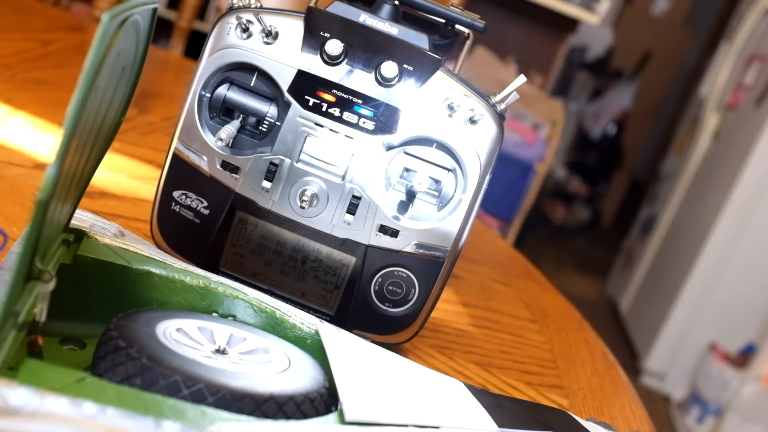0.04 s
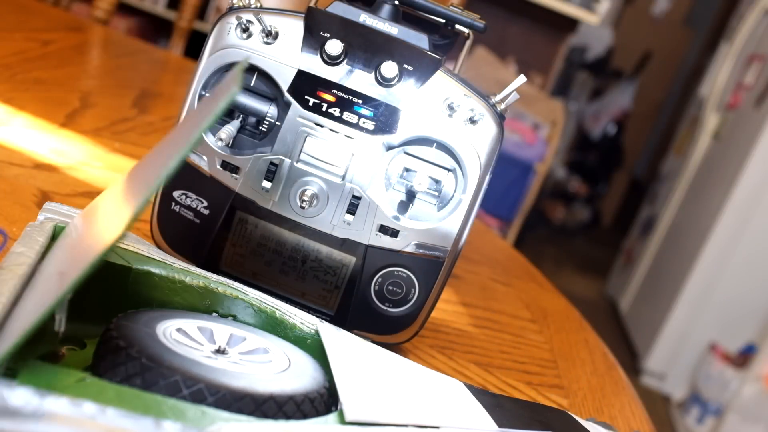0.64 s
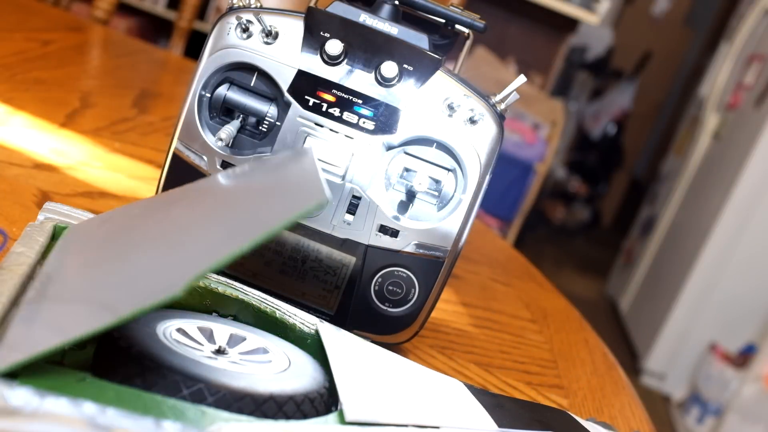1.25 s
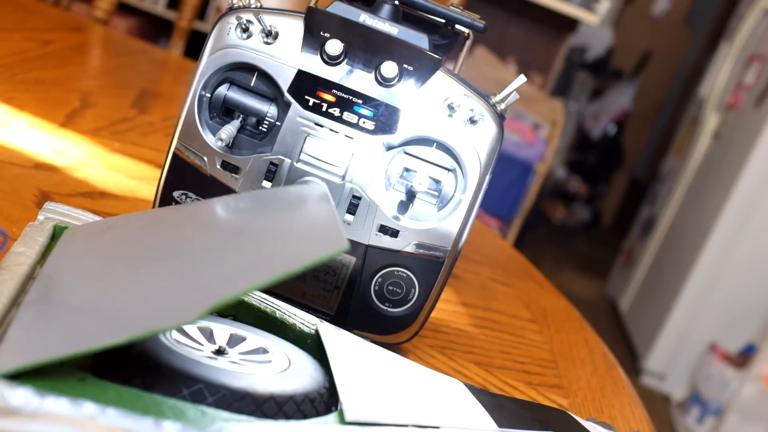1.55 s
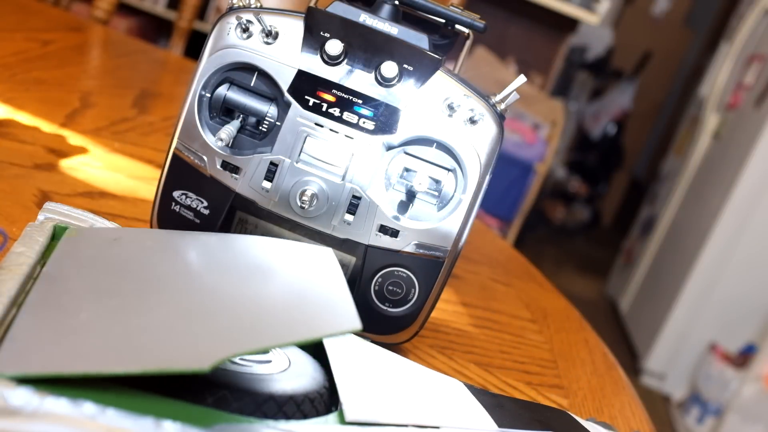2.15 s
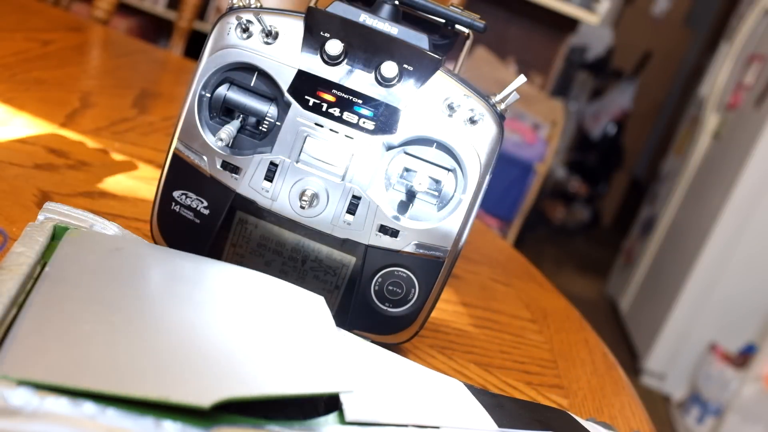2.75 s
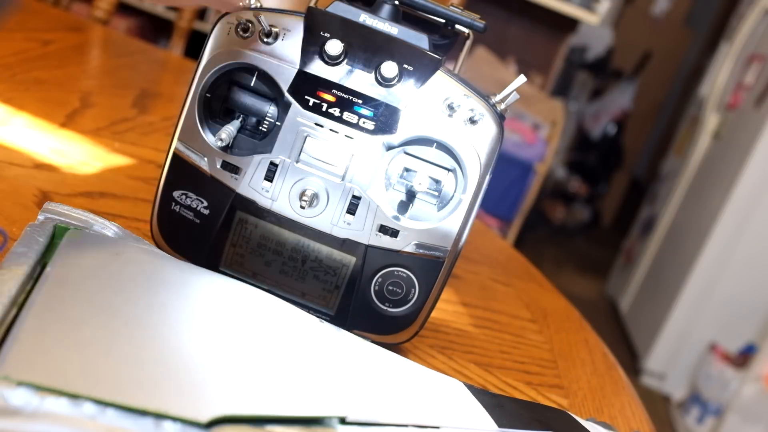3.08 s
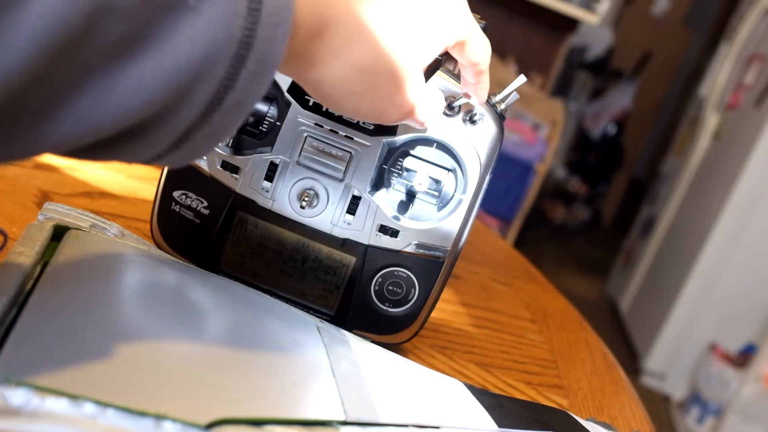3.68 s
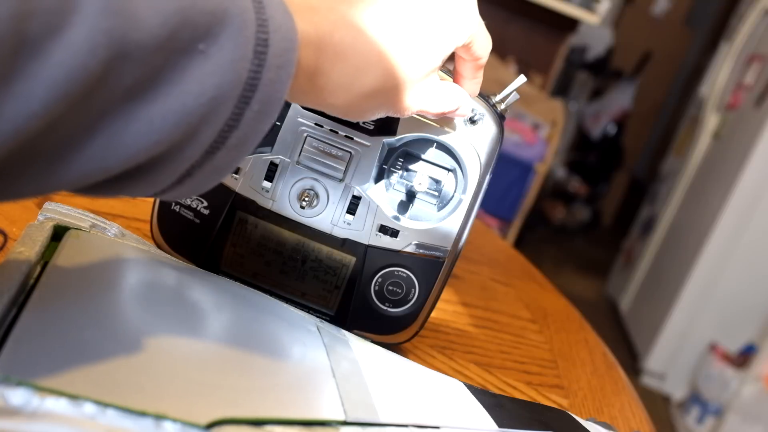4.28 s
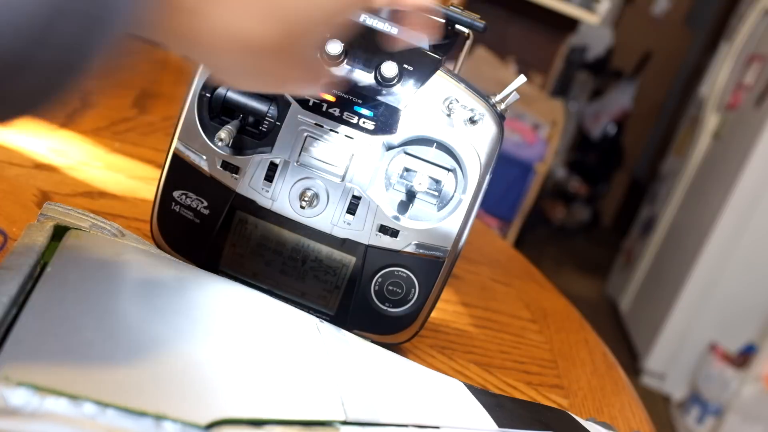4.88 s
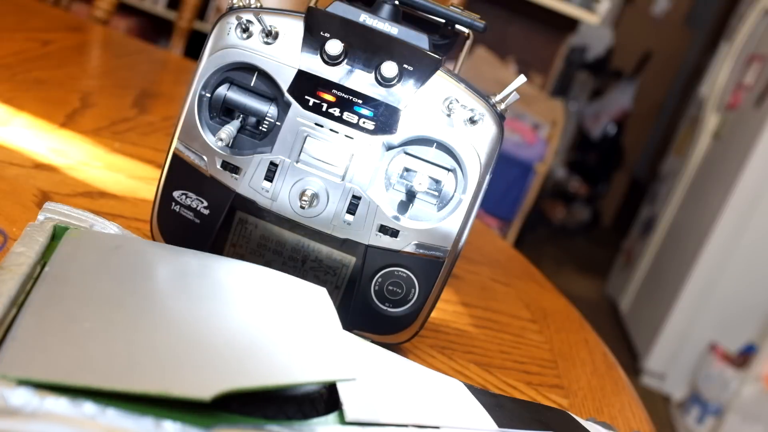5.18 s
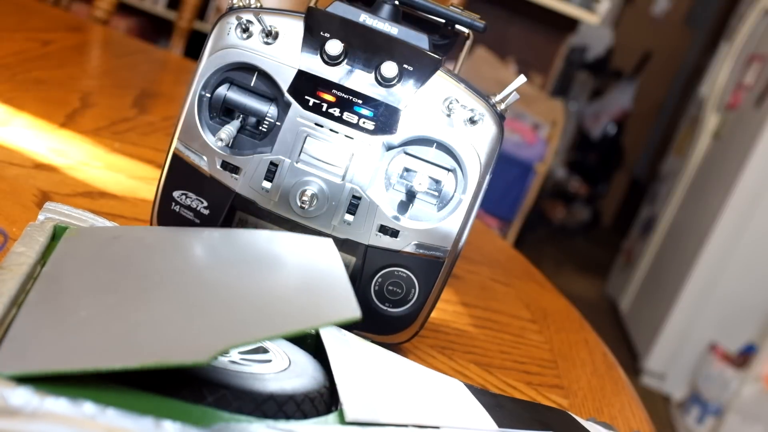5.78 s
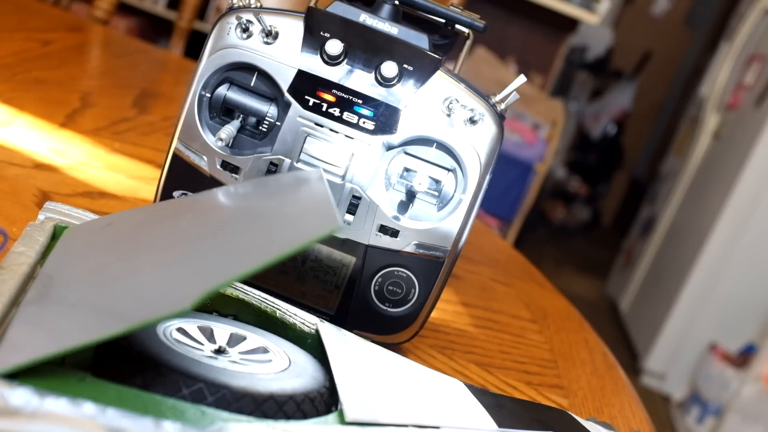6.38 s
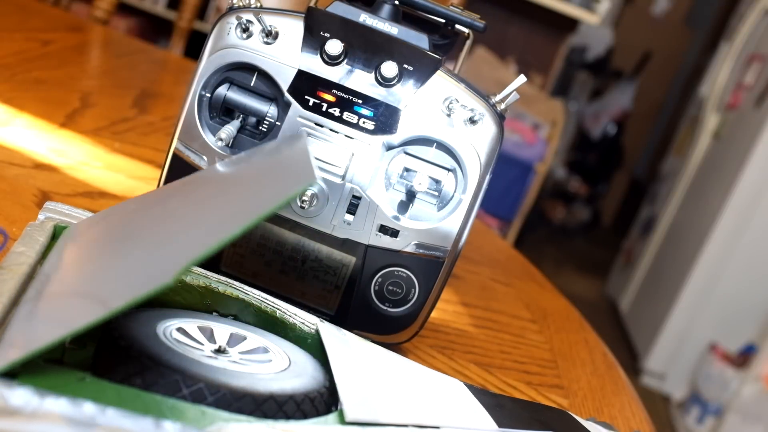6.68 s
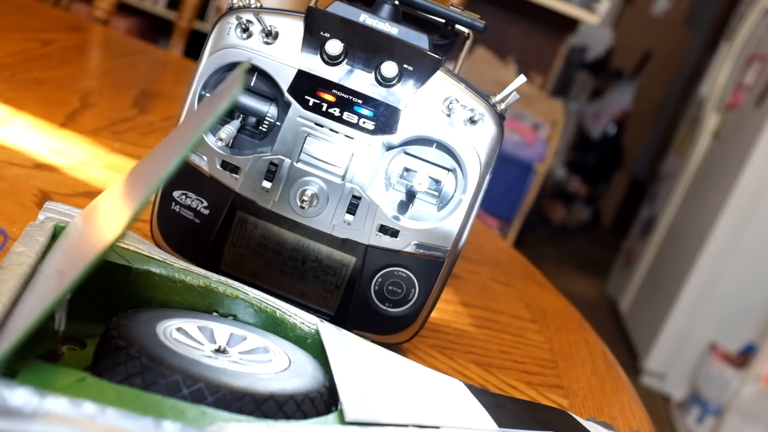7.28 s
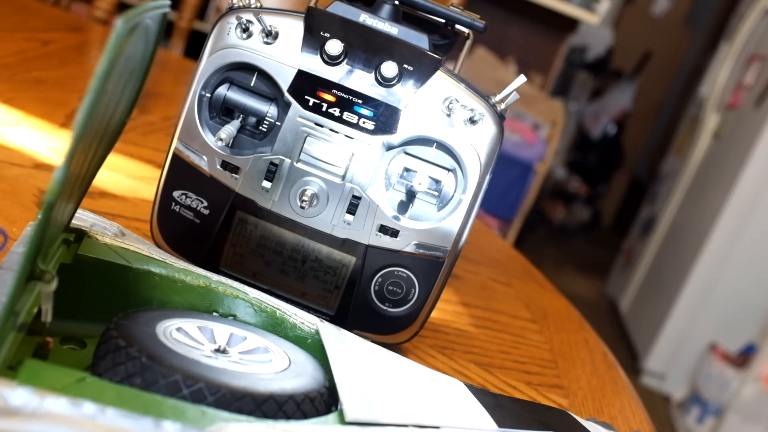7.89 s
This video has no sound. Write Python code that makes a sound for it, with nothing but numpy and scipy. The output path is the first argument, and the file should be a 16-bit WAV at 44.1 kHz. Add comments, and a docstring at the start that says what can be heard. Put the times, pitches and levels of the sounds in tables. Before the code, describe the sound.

A small servo on a model aircraft gives a quick whir, then slowly closes a gear door with a fine, rattling buzz. It stops, leaving a faint hush. A toggle switch clicks, two brief whirs follow, and the door jerks free with a hollow knock that rings the wing. The buzz resumes and grows as the door creeps open, heard close in a small room.

```python
"""Model aircraft gear doors.

On a table in a small room, the retract motor stops, a servo whirs, and a door creeps shut, its gears
kicked 50 times a second. A switch clicks, the servos whir twice more, and the door jerks free with a
knock that rings the wing, then creeps open. A faint hush and a low hum lie underneath."""
import sys
import numpy as np
from scipy import signal
from scipy.fft import rfft, irfft
from scipy.io import wavfile

SR = 44100
rng = np.random.default_rng(int(sys.argv[2]) if len(sys.argv) > 2 else 0)


def unload_wav(signal):
    """Save mono or channel-first audio to the path in sys.argv[1] as 16-bit WAV at rate SR, clipped to [-1, 1]."""
    wavfile.write(
        sys.argv[1],
        SR,
        np.round(np.clip(np.atleast_2d(signal).T, -1, 1) * 32767).astype(np.int16),
    )


N = 354431
T = np.arange(N) / SR
FRAME_S, FIRST_KICK_S = .0200083, .0030


def amp(db):
    """Decibels to gain."""
    return 10 ** (np.asarray(db) / 20)


def unit(x):
    """Scales to rms 1."""
    return x / np.sqrt(np.mean(x ** 2) + 1e-20)


def read(points, hz):
    """Interpolates a table over log frequency."""
    f, value = np.transpose(points)
    return np.interp(np.log(hz + 1), np.log(f + 1), value)


def wander(hz):
    """Random drift of rms 1, rolling off above hz."""
    lowpass = np.exp(-(np.fft.rfftfreq(N, 1 / SR) / hz) ** 2)
    return unit(irfft(rfft(rng.standard_normal(N)) * lowpass, N))


def colour(x, spectrum, body=None, size=4096):
    """Minimum-phase filter of unit energy from a spectrum and optional resonances."""
    hz = abs(np.fft.fftfreq(size, 1 / SR))
    gain = amp(read(spectrum, hz))
    if body is not None:
        gain *= np.sqrt(sum(amp(db) ** 2 * min(width / 150, 1)
                            / (1 + (2 * (hz - f) / max(width, 150)) ** 2) for f, width, db in body))
    log_response = np.conj(signal.hilbert(np.log(gain + 1e-6)))
    taps = np.fft.ifft(np.exp(log_response)).real[:size // 2]
    return signal.oaconvolve(x, taps / np.linalg.norm(taps))[:N]


def gate(start_s, end_s, edge_s):
    """1 between two times, 0 outside, with straight ramps."""
    return np.clip(np.minimum(T - start_s, end_s - T) / edge_s + .5, 0, 1)


def burst(peak_s, decay_s, rise_s):
    """Exponential rise and decay."""
    return np.exp(np.maximum(-np.maximum((T - peak_s) / decay_s, (peak_s - T) / rise_s), -60))


def ring(x, modes):
    """Damped modes; a unit click peaks at 1."""
    t = T[:SR]
    tone = sum(amp(db - 60 * t / t60) * np.sin(2 * np.pi * hz * t) for hz, db, t60 in modes)
    return signal.oaconvolve(x, tone / abs(tone).max())[:N]


def clicks(times_s, sizes):
    """Single-sample clicks."""
    return np.bincount(np.round(np.asarray(times_s) * SR).astype(int), sizes, N)[:N]


def teeth(per_s, spread_db):
    """Random tooth impacts of uneven size."""
    sizes = rng.standard_normal(N) * amp(spread_db * rng.standard_normal(N))
    return unit(sizes * (rng.random(N) < per_s / SR))


def frame_clock():
    """Control frame number and seconds since its kick."""
    frame, age_s = np.divmod(T + FRAME_S - FIRST_KICK_S, FRAME_S)
    return frame.astype(int), age_s


# Door travels, shut then open. Each row: start, end and easiest moment in seconds,
# relative level there in dB, growth away from it in dB per second squared.
TRAVELS = [(.42, 3.305, 2.07, -43, 1.0), (5.16, 8.1, 6.09, -42.5, 1.22)]
# The servo catches up with its command. Each row: start in seconds, length in seconds.
PAUSES = [(0.408, 0.083), (2.124, 0.025), (2.365, 0.027), (2.524, 0.039), (6.135, 0.017), (6.716, .02)]


def effort(travel, pause_db=-8, edge_s=.012):
    """Gain of a creeping servo: it labours toward either end of the swing and dips in the pauses."""
    start_s, end_s, easiest_s, db, growth = travel
    paused = sum(gate(s, s + length_s, edge_s) for s, length_s in PAUSES)
    away_s = np.clip(T, start_s, end_s) - easiest_s
    return gate(start_s, end_s, edge_s) * amp(db + growth * away_s ** 2 + pause_db * paused)


# Gearbox and airframe resonances along the swing. Each row: centre in Hz, width in Hz, gain in dB.
CLOSING_BODY = [(1100, 96, -2), (1540, 290, -4.5), (2450, 300, -3), (3630, 374, 1), (4400, 56, 0.5),
                (5530, 210, -10), (6220, 160, -9.5), (7900, 930, -5), (9100, 750, -8), (11340, 300, -18),
                (12030, 230, -14.5), (13800, 370, -22)]
NEARLY_SHUT_BODY = [(1110, 49, -0.5), (1486, 270, -0.5), (2170, 110, -2.5), (2680, 120, -4.5),
                    (3510, 510, -0.5), (4500, 440, -2), (5600, 48, 0), (7800, 1100, -5), (9300, 970, -8.5),
                    (11230, 170, -10), (12550, 170, -13)]
OPENING_BODY = [(1077, 300, -3), (1574, 155, -1.5), (2530, 600, -6.5), (3790, 310, 0), (4410, 350, 1),
                (5480, 330, 0), (6750, 500, -5.5), (7500, 760, -5.5), (8840, 290, -5.5), (9320, 200, -9),
                (10480, 330, -11)]
NEARLY_OPEN_BODY = [(1020, 140, -7.5), (1550, 130, -5), (2520, 200, -7.5), (4220, 560, -1), (5490, 200, -1),
                    (6140, 98, -7), (6900, 540, -9), (7660, 240, -5.5), (8920, 570, -6), (10400, 230, -19),
                    (11240, 220, -16.5)]
# Drive from the motor's kick and from loose teeth. Each row: frequency in Hz, gain in dB.
KICK_SPECTRUM = [(200, -12), (600, -6), (1200, 1.5), (2500, 5), (4500, -7), (8000, -9.5), (13000, 9.5),
                 (16000, -24)]
TEETH_SPECTRUM = [(200, -23.5), (600, -3.5), (1200, -6), (2500, -5), (4500, -2), (8000, -2.5), (13000, 7),
                  (16000, -5)]


def creep(travel, bodies, shift_s, kick_db, coast_s, idle):
    """Each control frame kicks the motor one step; the gears rattle as they coast."""
    frame, age_s = frame_clock()
    push, step, jitter = rng.standard_normal((frame[-1] + 1, 3))[frame].T
    age_s = np.maximum(age_s - .0003 * jitter, 0)
    strength_db = 2.2 * np.clip(push, -2.2, .8)
    kick = np.exp(-((age_s - .0017) / .0014) ** 2) * amp(strength_db)
    spin_up = 1 - np.exp(-(age_s / .0034) ** 2)
    spin = idle + spin_up * np.exp(-age_s / coast_s) * amp(.44 * strength_db + 2.05 * step)
    knocks = unit(kick * teeth(18000, 2.7))
    rattle = unit(spin * teeth(11000, 1.7))
    early, late = (unit(colour(rattle, TEETH_SPECTRUM, body)
                        + amp(kick_db) * colour(knocks, KICK_SPECTRUM, body)) for body in bodies)
    # resonances shift as the door swings and the load changes
    share = np.interp(T, shift_s, [0, 1])
    return effort(travel) * ((1 - share) * early + share * late)


# Fast runs. Each row: start, rise and coast in seconds, top speed in rev/s, relative level in dB,
# dB per doubling of speed, surge in rev/s, whine over rattle in dB.
RUNS = [(.16, .16, .125, 600, -24.5, 14, 55.6, -6.5), (4.624, .034, .058, 525, -24, 16, 4, 0.5),
        (4.843, .232, .084, 565, -25.5, 11, 52, 0.5)]
# Gear rattle of each run. Each row: frequency in Hz, gain in dB.
SHUT_RATTLE = [(290, -57.5), (500, -35), (761, -20), (1030, -1.5), (1230, -11), (1510, -10.5), (2540, -5.5),
               (3290, -12), (3590, -0.5), (4870, -17), (5550, -16), (6610, -8.5), (9090, 1), (13800, -11.5),
               (16000, -18.5)]
LATCH_RATTLE = [(290, -34), (500, -35), (1380, -10), (1640, -10), (3060, -16.5), (3650, -6), (5160, -0.5),
                (6510, -28), (7860, -11.5), (12700, -17), (16000, -26)]
OPEN_RATTLE = [(290, -54), (500, -25), (784, -16), (880, -6.5), (1210, -11), (1620, -2), (1900, -13),
               (2070, -8), (3150, -9), (5470, -1.5), (6330, -8.5), (7860, -1.5), (9770, -5.5), (12300, 1.5),
               (16000, -25)]
# Whine; a ten-tooth pinion meshes at order 10. Each row: multiple of motor speed, relative level in dB.
MOTOR_ORDERS = [(2, -18), (5, -10.5), (10, 1.5), (15, -3.5), (20, -1), (25, -7.5), (30, -16)]


def whir(run, rattle_spectrum, throb, tilt_db, ease, mesh_db=0, drive_s=.00605):
    """A servo speeds up, surging under each drive pulse so that its whine saws upward, then coasts."""
    start_s, rise_s, coast_s, top_rps, run_db, doubling_db, surge_rps, whine_db = run
    start_rps, full_rattle_rps = 160, 484
    risen = np.clip((T - start_s) / rise_s, 0, 1)
    coasted = np.clip((T - start_s - rise_s) / coast_s, 0, 1)
    pace = (1 - (1 - risen) ** ease) * (1 - coasted ** 1.25)
    rps = start_rps + (top_rps - start_rps) * pace
    saw = np.interp(frame_clock()[1], [0, drive_s, FRAME_S], [-1, 1, -1])
    surge = saw * surge_rps / rps * (1 - .43 * risen) * (1 - coasted) ** 2
    turns = np.cumsum(rps * (1 + surge + .00704 * wander(510))) / SR
    whine = 0
    for order, db in MOTOR_ORDERS:
        level = amp(db + tilt_db * np.log2(order / 10) + mesh_db * (order == 10))
        flutter = 1 + .56 * wander(190)
        whine += level * flutter * np.cos(2 * np.pi * (order * turns + rng.random()))
    # worn teeth strike hardest once a turn
    rattle = colour(teeth(12000, 1.9) * (1 + .5 * np.cos(2 * np.pi * turns)), rattle_spectrum)
    # unloaded gears quieten and the whine stands out
    level_db = run_db + doubling_db * np.log2(np.minimum(rps / full_rattle_rps, 1)) - 9.5 * coasted ** 2
    whine_ratio = amp(whine_db + 4.5 * np.log2(rps / top_rps) + 4 * np.sqrt(coasted))
    gain = gate(start_s, start_s + rise_s + coast_s, .0049) * amp(level_db) * (1 + throb * surge)
    return gain * (unit(rattle) + whine_ratio * unit(whine)) / np.sqrt(1 + whine_ratio ** 2)


# Lone twitches and hardest kicks. Each row: time in seconds, relative level in dB, fizz over clack in dB.
TICKS = [(0.0825, -31, -2.5), (0.1233, -36.5, 6), (0.145, -35.5, 1), (0.1655, -30, -7), (0.1855, -26.5, -4),
         (0.362, -22, 4), (0.3838, -24, -1), (0.4433, -31.5, -1), (3.325, -36, -6), (3.3457, -34, -9),
         (3.3652, -33.5, -6), (3.4253, -33.5, -7), (4.6724, -27, 1), (4.7709, -33, -5), (4.805, -31.5, -9),
         (4.9256, -23.5, -20), (4.9473, -27, -8), (5.1254, -27, -1), (5.7446, -30, -14), (6.1675, -29, -13),
         (6.3058, -28, -7), (6.565, -25, -10), (7.367, -32, -12), (7.4053, -31.5, -9)]
# Backlash clack. Each row: frequency in Hz, gain in dB.
CLACK_SPECTRUM = [(350, -51), (600, -20.5), (1560, 1.5), (1990, -10), (2540, -2), (3100, -9), (3600, -2),
                  (6780, -24), (7250, -15), (9880, -25), (11500, -14), (15000, -42)]


def ticks(hard_share=.1, hard_db=-38, hard_fizz_db=-2):
    """Hard kicks take up the backlash in a cluster of impacts; some come by chance during a creep."""
    kicks_s = np.arange(FIRST_KICK_S, T[-1], FRAME_S)
    creeping = sum((kicks_s > start_s) & (kicks_s < end_s) for start_s, end_s, *_ in TRAVELS)
    hard_s = kicks_s[rng.random(len(kicks_s)) < hard_share * creeping]
    times_s, db, fizz_db = np.transpose(list(TICKS) + [(s, hard_db, hard_fizz_db) for s in hard_s])
    shape = burst(.0015, decay_s=.0015, rise_s=.0006)[:SR // 20]
    clack, fizz = (signal.oaconvolve(clicks(times_s, amp(level_db)), shape)[:N] * teeth(20000, 1.4)
                   for level_db in (db, db + fizz_db))
    return amp(-3) * (colour(clack, CLACK_SPECTRUM) + colour(fizz, TEETH_SPECTRUM, OPENING_BODY))


# Door striking the wing. Each row: frequency in Hz, gain in dB.
BLOW_SPECTRUM = [(24, -48), (40, -22), (114, -6), (189, -15.5), (306, -7.5), (437, -14), (598, -12),
                 (785, -19), (989, -18), (1270, -27), (1890, -25), (2240, -26.5), (2440, -31), (6000, -40),
                 (7800, -62), (13200, -120)]
# Wing and table. Each row: frequency in Hz, relative level in dB, T60 in seconds.
WING_MODES = [(129.5, 0, .55), (249.6, -3, 0.63), (306, 9, 0.2), (365, -17, .45), (436, -0.5, 0.32),
              (490, -10, 0.56), (560, -9, 0.59), (700, -6, .35), (820, -2, .4), (980, -21, .4),
              (1155, -11, 0.68)]
# Soft hinge bumps. Each row: time in seconds, relative level in dB.
HINGE_BUMPS = [(0.439, -34), (0.571, -48), (5.422, -37), (5.454, -29), (5.989, -40), (6.182, -39.5)]


def door_knocks(free_s=5.3076, judder_hz=127, panel_hz=311):
    """The door cracks loose and judders against the wing, which rings from this and from hinge bumps."""
    bounce = np.arange(5)
    blows = clicks(free_s + bounce / judder_hz, amp(-3.2 * bounce))
    scrape = amp(-21) * burst(free_s + .005, .033, .001) * rng.standard_normal(N)
    thud = colour(amp(4) * blows + scrape, BLOW_SPECTRUM)
    crack = amp(-21) * burst(free_s + .0014, .0078, .00063) * rng.standard_normal(N)
    crack = colour(crack, [(500, -6), (5000, 2), (11000, 2), (16000, -14)])
    bump_s, bump_db = np.transpose(HINGE_BUMPS)
    wing = ring(amp(-31) * blows + clicks(bump_s, amp(bump_db - 3)), WING_MODES)
    boom = amp(-18) * burst(free_s + .008, .018, .003) * np.sin(2 * np.pi * panel_hz * T)
    return thud + boom + wing + crack


# Toggle snap. Each row: frequency in Hz, gain in dB.
SNAP_SPECTRUM = [(180, -37), (300, -13), (528, -4), (900, -17), (1970, -3), (2930, -11), (4590, -12),
                 (5080, -18), (7950, -2), (8790, -7), (9710, 2.5), (11700, -6), (13800, -1), (16000, -8)]
# Transmitter case. Each row: frequency in Hz, relative level in dB, T60 in seconds.
CASE_MODES = [(136, -10, 0.43), (457, -3, 0.14), (767, -16, .15), (1044, -15, .12)]


def switch(at_s=4.5535):
    """The toggle snaps over and the transmitter's case rings briefly."""
    snap = colour(burst(at_s, .0025, .0002) * rng.standard_normal(N), SNAP_SPECTRUM)
    return amp(-20) * snap + ring(clicks([at_s], amp([-38])), CASE_MODES)


# Retract motor whine. Each row: frequency in Hz, relative level in dB.
RETRACT_TONES = [(1010, -4), (1997, -20), (3005, -30)]


def retract(cut_s=.0084, fall_db_per_s=450):
    """The retract motor cuts out as the wheel reaches its well; whine and gear noise fade fast."""
    whine = sum(amp(db) * np.sin(2 * np.pi * hz * T) for hz, db in RETRACT_TONES)
    spectrum = [(400, -14), (1400, .5), (3000, -9), (5300, -12), (9000, -18), (15000, -30.5)]
    gears = colour(teeth(9000, 2.7), spectrum)
    return amp(-28 - fall_db_per_s * np.clip(T - cut_s, 0, 1)) * (whine + amp(-12) * gears)


# Shading of the right microphone. Each row: frequency in Hz, gain in dB at shade 1.
RIGHT_SHADE = [(100, -6), (600, -3.5), (2000, -8), (4000, -12), (8000, -16), (14000, -19.5)]


def direct(x, shade, lag_s=.000045):
    """The left microphone faces the model; the right hears it later and shaded."""
    hz = np.fft.rfftfreq(N, 1 / SR)
    response = amp(shade * read(RIGHT_SHADE, hz)) * np.exp(-2j * np.pi * hz * lag_s)
    return np.array([x, irfft(rfft(x) * response, N)])


# Room decay. Each row: frequency in Hz, T60 in seconds.
ROOM_T60 = [(100, 0.61), (400, 0.62), (1500, 0.48), (5000, 0.31), (14000, 0.19)]


def room(x, wet_db, correlation):
    """Diffuse stereo tail, each band dying at its own rate."""
    echoes = rng.standard_normal((2, SR)) * (rng.random((2, SR)) < .1)
    hz, t, bands = signal.stft(echoes, SR, nperseg=256)
    tail = signal.istft(bands * amp(-60 * t / read(ROOM_T60, hz)[:, None]), SR, nperseg=256)[1]
    left, other = tail * np.clip(np.arange(tail.shape[1]) / SR / .00079, 0, 1)
    right = amp(-4) * (correlation * left + np.sqrt(1 - correlation ** 2) * other)
    response = np.array([left, right]) / np.linalg.norm(left)
    return amp(wet_db) * signal.oaconvolve(x[None], response, axes=1)[:, :N]


def moving_room(x, wet_db, correlation, count=3, cycle_s=1.713):
    """The swinging door changes the paths into the room: tails fade from one to the next."""
    fades = (np.cos(np.pi * (T / cycle_s + k / count)) * np.sqrt(2 / count) for k in range(count))
    return sum(room(x * fade, wet_db, correlation) for fade in fades)


# Hush spectrum and hum tones. Each row: frequency in Hz, relative level in dB.
HUSH_SPECTRUM = [(20, -18), (45, -13), (60, -7), (80, -11.5), (115, -8), (150, -9.5), (250, -6),
                 (500, -12.5), (900, -16.5), (2000, -22.5), (5000, -27.5), (9000, -33.5), (13000, -37.5),
                 (16000, -44)]
HUM_TONES = [(58, -61.5), (113, -59.5)]


def room_air(correlation=.37, swell_db=4):
    """Steady hush and a wavering low hum whose upper tone swells for a few seconds."""
    left, other = (unit(colour(rng.standard_normal(N), HUSH_SPECTRUM)) for _ in range(2))
    right = correlation * left + np.sqrt(1 - correlation ** 2) * other
    hush = amp(-52.5) * np.array([left, right])
    low, high = (amp(db) * (1 + .092 * wander(7.6))
                 * np.sin(2 * np.pi * np.cumsum(hz + 1.51 * wander(3.9)) / SR) for hz, db in HUM_TONES)
    swell = amp(swell_db * gate(.31, 3.9, edge_s=.5))
    return (hush + low + swell * high) * amp([[1.2], [-3]])


def scene():
    """Gears and door, direct and through the room, over the hush."""
    closing = creep(TRAVELS[0], (CLOSING_BODY, NEARLY_SHUT_BODY), shift_s=(1.9, 2.7),
                    kick_db=-6.5, coast_s=.0077, idle=.3)
    opening = creep(TRAVELS[1], (OPENING_BODY, NEARLY_OPEN_BODY), shift_s=(6.8, 7.5),
                    kick_db=-4.5, coast_s=.0055, idle=.18)
    runs = (whir(RUNS[0], SHUT_RATTLE, throb=2.6, tilt_db=.5, ease=1.4, mesh_db=-13)
            + whir(RUNS[1], LATCH_RATTLE, throb=0, tilt_db=0, ease=1.3)
            + whir(RUNS[2], OPEN_RATTLE, throb=1.8, tilt_db=1, ease=.94, drive_s=.008))
    gears = amp(4) * (closing + opening + runs + ticks() + retract() + switch())
    door = amp(3) * door_knocks()
    return (direct(gears, shade=.97) + moving_room(gears, wet_db=-8.5, correlation=.095)
            + direct(door, shade=1) + room(door, wet_db=-11, correlation=.95) + room_air())


def record(dry):
    """Low-pass at 15.8 kHz."""
    taps = signal.firwin(511, 15800, window=("kaiser", 9), fs=SR)
    return signal.oaconvolve(dry, taps[None], "same")


dry = scene()
out = record(dry)
unload_wav(out)
```